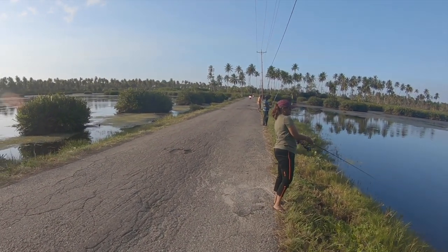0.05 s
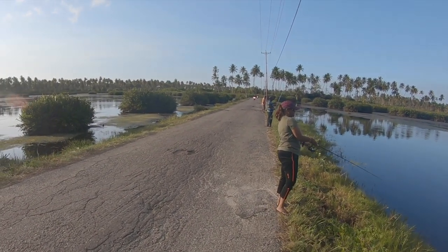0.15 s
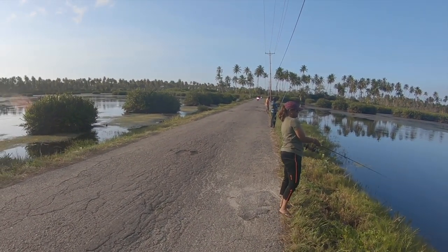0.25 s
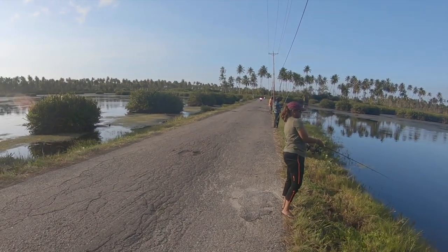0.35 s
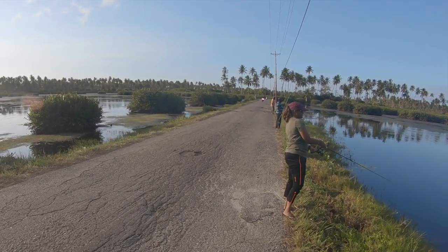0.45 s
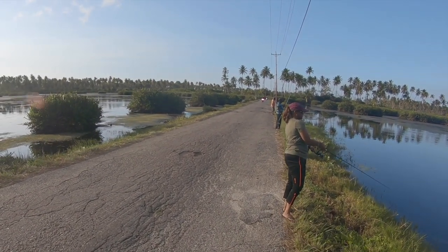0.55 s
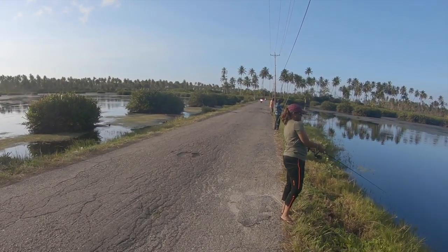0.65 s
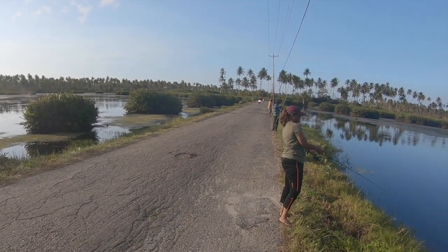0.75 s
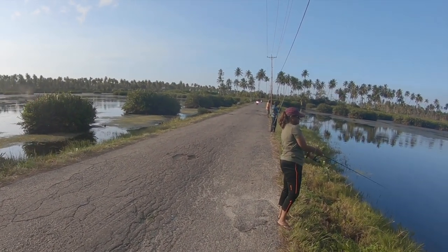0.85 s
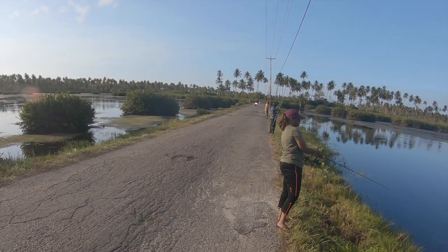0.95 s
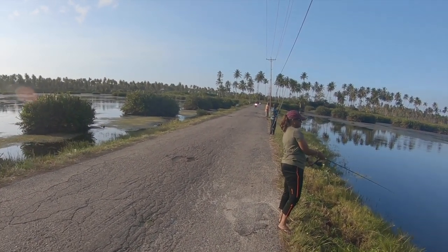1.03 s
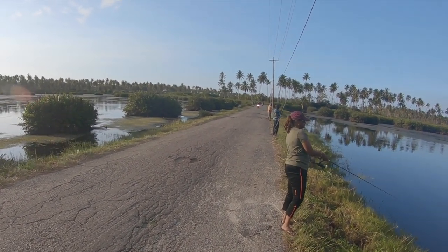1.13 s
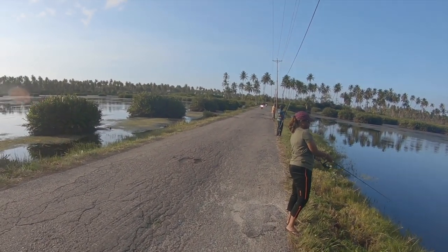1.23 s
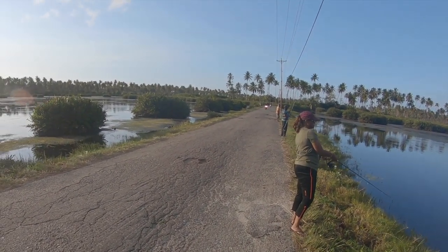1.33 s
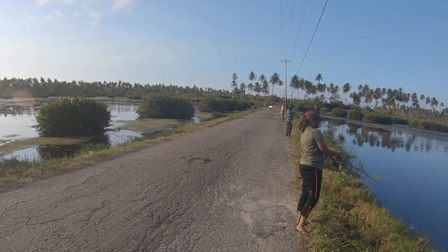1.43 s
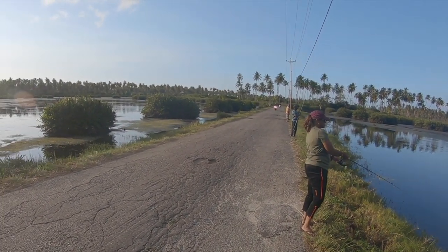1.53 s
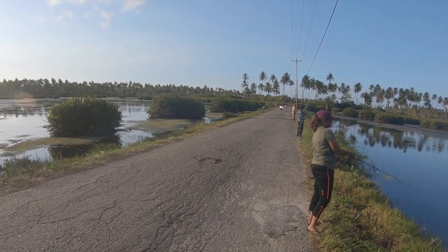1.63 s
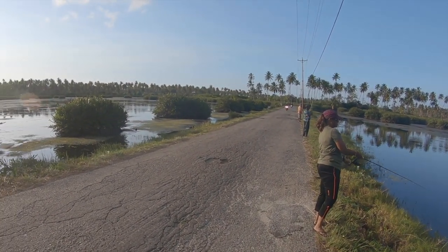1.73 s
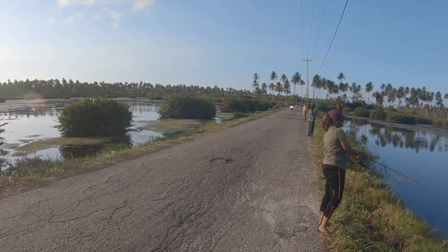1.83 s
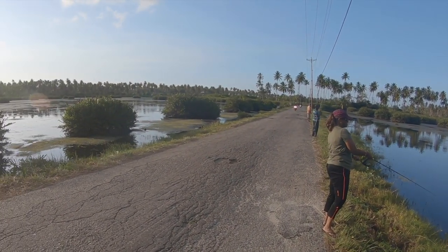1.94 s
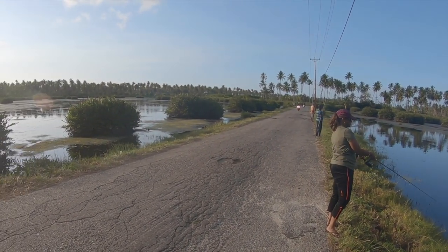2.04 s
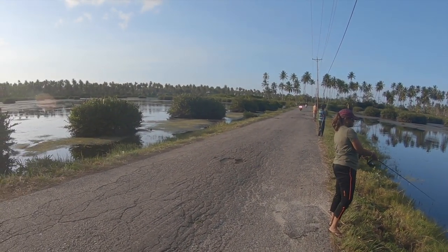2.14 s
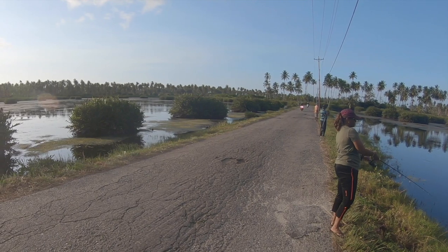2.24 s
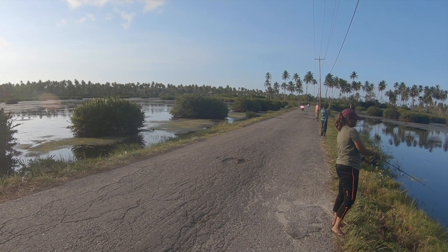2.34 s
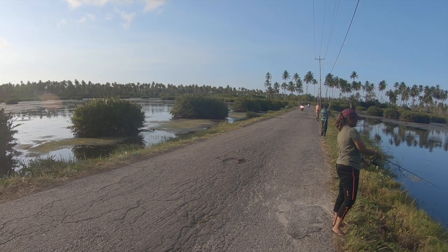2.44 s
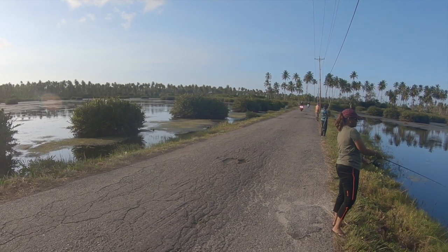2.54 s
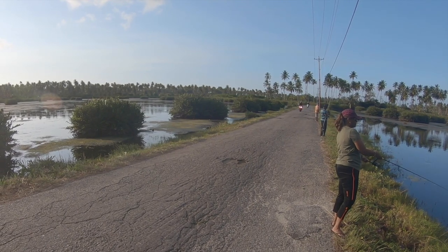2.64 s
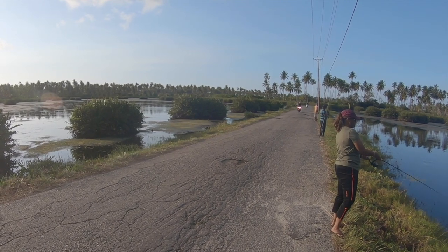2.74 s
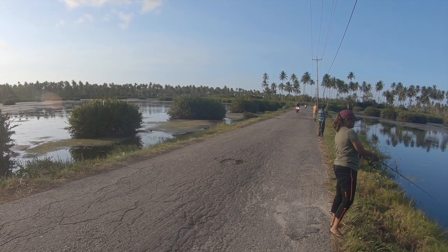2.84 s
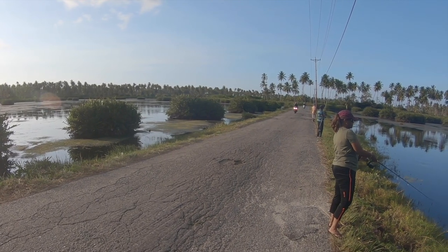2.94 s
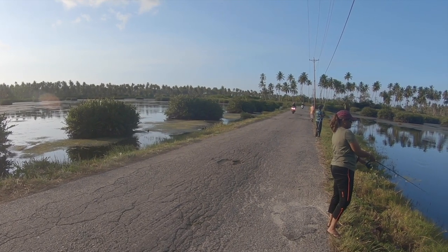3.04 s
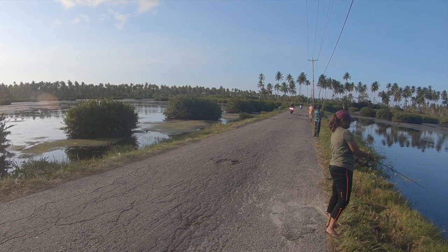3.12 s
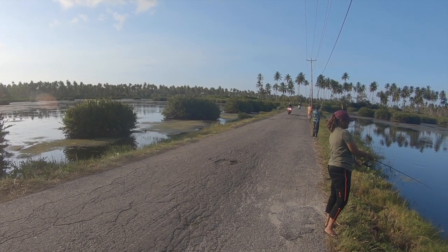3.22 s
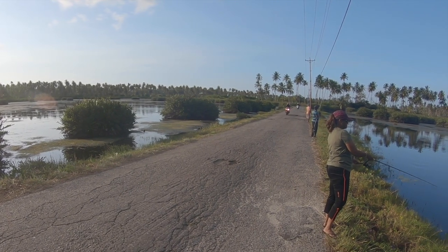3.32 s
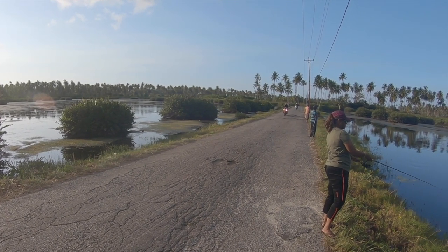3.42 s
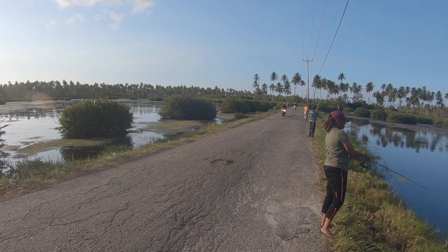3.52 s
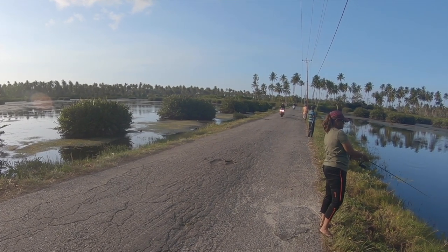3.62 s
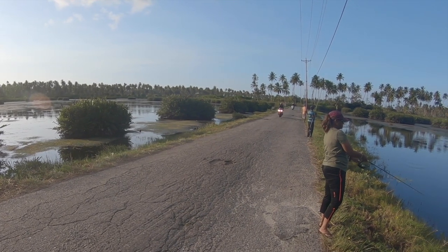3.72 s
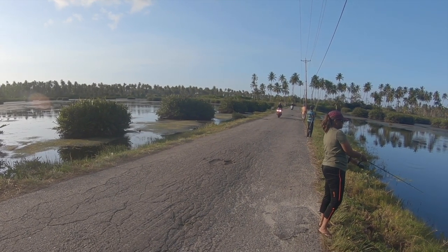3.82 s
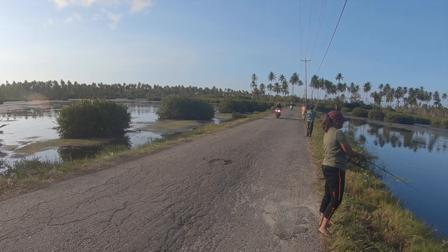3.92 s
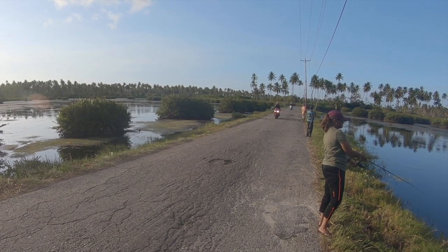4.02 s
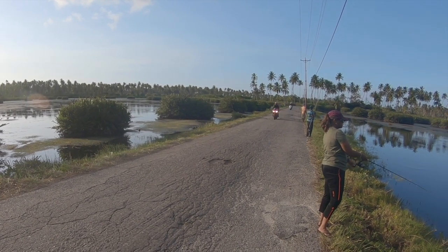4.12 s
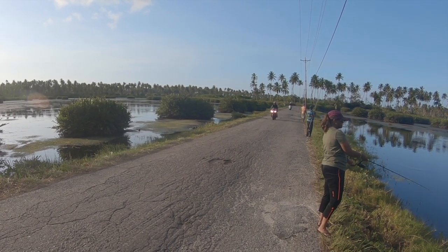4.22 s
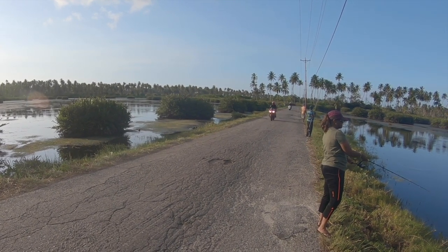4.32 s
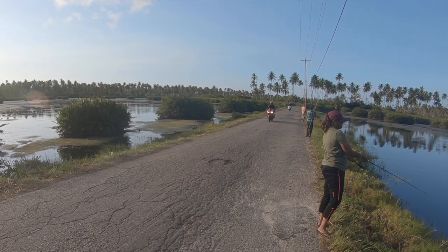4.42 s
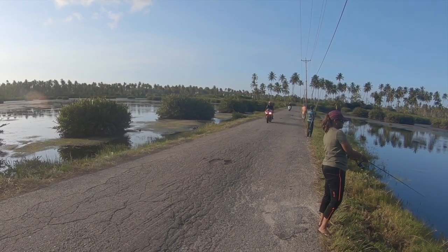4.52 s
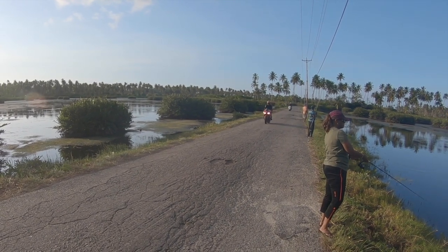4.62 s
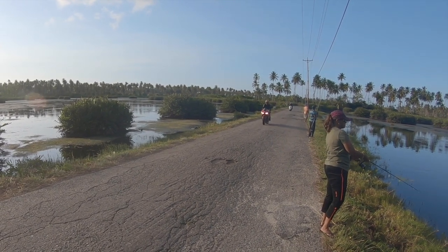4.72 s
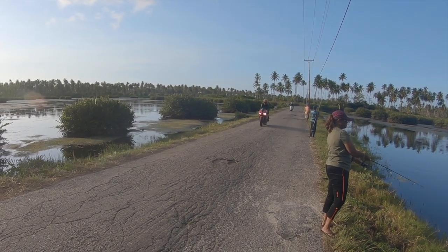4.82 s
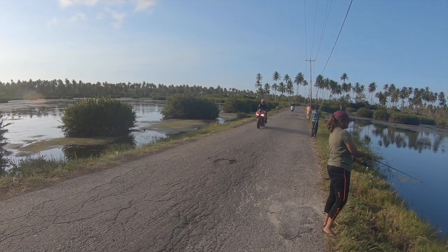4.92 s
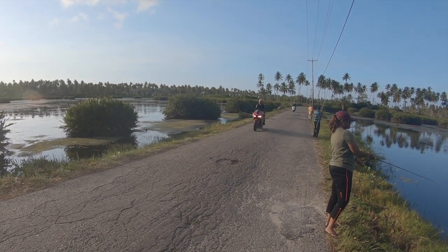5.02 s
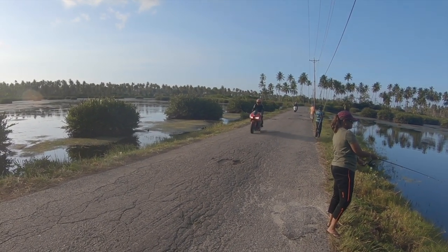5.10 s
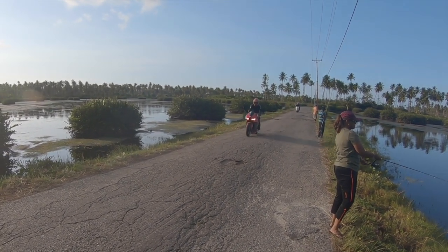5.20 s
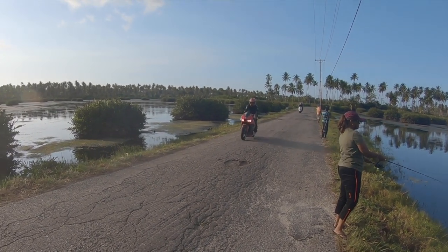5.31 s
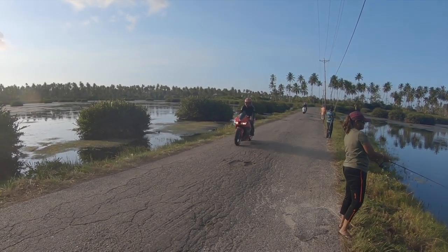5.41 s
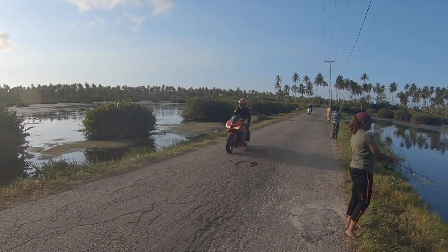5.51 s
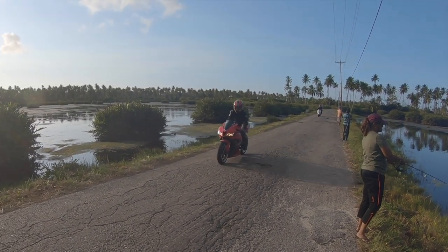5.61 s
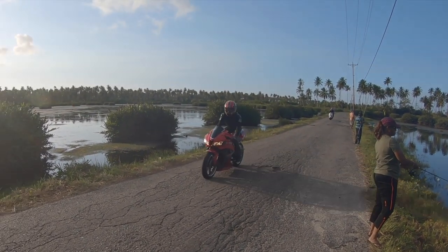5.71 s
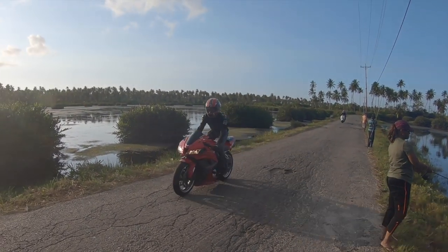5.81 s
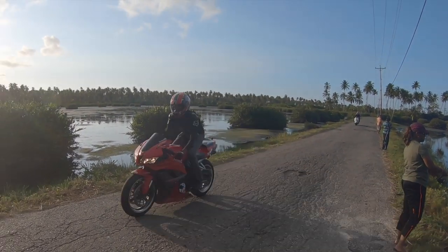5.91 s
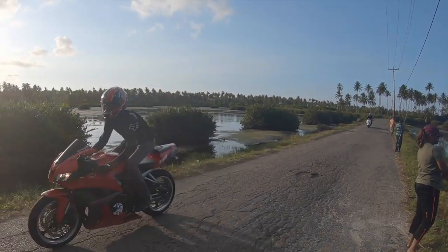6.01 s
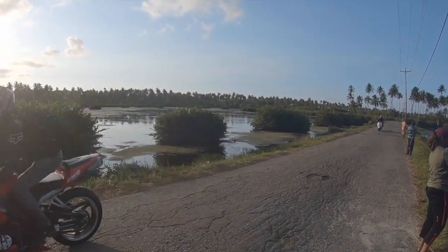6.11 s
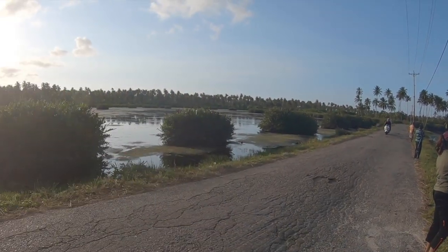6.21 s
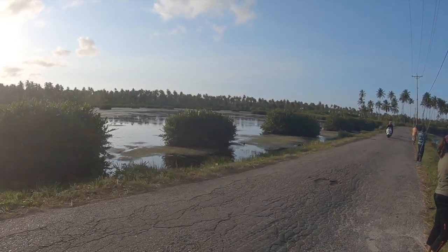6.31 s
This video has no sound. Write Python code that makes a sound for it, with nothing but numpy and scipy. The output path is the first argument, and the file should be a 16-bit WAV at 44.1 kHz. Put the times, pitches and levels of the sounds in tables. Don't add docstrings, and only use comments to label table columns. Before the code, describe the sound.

Outdoors on a quiet pond road, a small camera microphone hears several distant motorcycles as a low blended drone, with faint bird chirps and tiny dry ticks. One engine's deep hum takes over, wavering slightly as it swells. Tyre hiss builds, then the bike bursts past very close with a rasping growl and a rush of air, its pitch dipping only a little, still loud at the end.

```python
import sys
import numpy as np
from scipy import signal
from scipy.fft import rfft, irfft, next_fast_len
from scipy.io import wavfile
from scipy.ndimage import uniform_filter1d

SR = 44100
rng = np.random.default_rng(int(sys.argv[2]) if len(sys.argv) > 2 else 0)


def gain_from_db(level_db):
    decades = np.asarray(level_db, float) / 20
    return 10 ** decades


def int16_out(signal):
    q = np.round(np.clip(np.atleast_2d(signal).T, -1, 1) * 32767)
    wavfile.write(sys.argv[1], SR, q.astype(np.int16))


N = 280211
SIZE = next_fast_len(N, real=True)
FREQ = np.maximum(np.fft.rfftfreq(SIZE, 1 / SR), 1)
TIME = np.arange(N) / SR


def over_hz(table):
    hz, value = np.transpose(table)
    return np.interp(np.log(FREQ), np.log(np.maximum(hz, 1)), value)


def over_time(table):
    s, *columns = np.transpose(table)
    return [np.interp(TIME, s, c) for c in columns]


def walk(rate_hz):
    hold = int(SR / rate_hz)
    steps = np.repeat(rng.standard_normal(N // hold + 1), hold)
    return 1.3 * uniform_filter1d(uniform_filter1d(steps, hold), hold)[:N]


def engine(hz, orders, shimmer_db, fade_db, wander, blur):
    crank = 2 * np.pi * np.cumsum(hz * (1 + wander * walk(12.))) / SR
    start = rng.uniform(0, 2 * np.pi, len(orders))
    hum = 0
    for (k, gain), phase in zip(orders, start):
        air = gain_from_db(shimmer_db * walk(14.) + fade_db * walk(4.038))
        hum = hum + gain * air * np.sin(k * crank + phase + blur * k * walk(20.))
    return np.sqrt(2) * hum, crank


def noise(shape, swell_db, flicker_db, rate_hz):
    colour = rfft(rng.standard_normal((2, SIZE))) * gain_from_db(over_hz(shape))
    octave, out, swell = np.log2(FREQ), 0, swell_db * walk(rate_hz)
    for centre in np.arange(np.log2(shape[0][0]), np.log2(shape[-1][0]) + .5, .5):
        slot = np.clip(1 - 2 * abs(octave - centre), 0, 1)
        out = out + irfft(colour * slot, SIZE)[:, :N] * gain_from_db(swell + flicker_db * walk(rate_hz))
    return out / out.std()


SPEED_M_S, PASSES_S, KERB_M = 10.22, 6.002, 2.59


def distance(lag_s):
    return np.hypot(SPEED_M_S * (TIME - PASSES_S - lag_s), KERB_M)


ROAD_SHARE = 0.81


def detour():
    pipe_lag_s, heights_m = 0.3, 2.114
    r = distance(pipe_lag_s)
    return np.hypot(r, heights_m) - r


RUSH = {"roar": (-28.5, 1.56, -21.5, 4), "tyres": (-59.5, 1.67, -38.5, 2.5),
        "rear tyre": (-97, .1, -40, 4.5), "chain": (-67.5, 2.5, -42.5, 1.37), "fizz": (-95, 2, -58.5, 2.5),
        "wake": (-94.5, 0, -39.5, 5.5), "rasp": (-93.5, 1, -41.5, 5.5)}
LAG_S = {"roar": .25, "tyres": -.13, "rear tyre": .22, "chain": -.02, "fizz": .05, "wake": .1, "rasp": -.02}


def rush(name):
    pack_db, rise_db, near_db, steep = RUSH[name]
    bike = gain_from_db(near_db) * (KERB_M / distance(LAG_S[name])) ** steep
    return np.hypot(gain_from_db(pack_db + rise_db * TIME), bike)


# (time [s], firing rate [Hz], level [dB], throttle [0-1])
LEAD = [(0, 120.7, -22, 0.86), (.6, 118.3, -25, 0.73), (.68, 118, -20.5, 0.2), (1.6, 113.1, -27, .1),
        (2.2, 110.5, -18, .1), (3.05, 107.4, -16.5, 0.1), (3.22, 104.3, -17, 0.7), (3.7, 103.6, -9.5, 0.78),
        (3.95, 102.5, -10.5, .75), (4.35, 102.3, -4.5, 0.8), (4.65, 102, -2.5, 0.8),
        (5.0, 102.5, -2.1, 0.74), (5.4, 102.6, -0.5, 0.81), (5.65, 102.6, -1, 0.85), (5.95, 102.6, 3, .6),
        (6.0, 99.05, 2, 0.5), (6.2, 97.77, -1, 0.9), (6.35, 98.4, 0, 0.8)]
# (order [x], level [dB], share of level change [-], lift by throttle [dB], lift behind the pipe [dB])
LEAD_ORDERS = [(.5, -41, 0.21, -1.5, 6.5), (1, -18.5, 0.51, -0.7, 4), (1.5, -37.5, 0.59, -5.5, 5.5),
               (2, -15.5, 1, 1, 0.8), (2.5, -58, 0.17, 20.5, 10), (3, -48.5, .05, 20.5, -2),
               (3.5, -51.5, 0.2, 21, -3), (4, -32.5, 0.29, 3.5, 6), (4.5, -49, 0.56, 0.5, 7.5),
               (5, -28, 0.86, 0.8, 5.5), (5.5, -50.5, .95, -0.5, 6.5), (6, -63.5, 0.062, 17, 14)]
# (order [x], level against the rasp [dB])
GROWL = [(5.5, -5), (6, 5), (6.5, -0.5), (7, 2.5), (7.5, -6.5), (8, -5), (8.5, -8.5), (9, -5.5),
         (9.5, -8.5), (10, -6.5)]
# (order [x], level against the rear tyre [dB])
TAIL_PIPE = [(8.5, -4.5), (9, 0), (9.5, -4), (10, -2)]
# (peak time [s], gain [Hz], rise [s], fall [s])
FLARES = [(3.621, 3.13, 0.3556, 0.044), (3.86, 3.9, .15, 0.031), (4.201, 2.04, 0.045, .2),
          (4.675, 3.16, .07, .06), (4.799, 2.37, .05, .05), (4.941, 2.23, .07, 0.045),
          (5.249, 2.4, .25, .17), (5.53, 1.59, .08, .08), (5.87, 1.82, .25, .04), (6.272, 1.1, .08, .08)]
# (time [s], width [s], depth [dB])
DIP = (5.985, .011, -13)


def first_bike():
    hz, level_db, throttle = over_time(LEAD)
    for s, gain_hz, rise_s, fall_s in FLARES:
        hz = hz + np.interp(TIME, [s - rise_s, s, s + fall_s], [0, gain_hz, 0])
    r = distance(0)
    pipe_turns_s, turn_s, rear_road_share = 5.97, 0.048, 0.45
    rear = .5 + .5 * np.tanh((TIME - pipe_turns_s) / turn_s)
    share = np.clip(ROAD_SHARE + (rear_road_share - ROAD_SHARE) * rear, 0, .95)
    delay_s = detour() / 343

    def road(k):
        return abs(1 + share * np.exp(2j * np.pi * k * hz * delay_s)) / (1 + share)

    orders = []
    for k, db, part, lift_db, rear_db in LEAD_ORDERS:
        orders.append((k, road(k) * gain_from_db(db + part * level_db + lift_db * throttle + rear_db * rear)))
    close, tail = rush("rasp"), rush("rear tyre")
    orders += [(k, road(k) * close * gain_from_db(db)) for k, db in GROWL]
    orders += [(k, tail * gain_from_db(db)) for k, db in TAIL_PIPE]
    hum, crank = engine(hz, orders, shimmer_db=.55, fade_db=.4 + .03 * r, wander=.002, blur=.04 + .002 * r)
    dip_s, width_s, depth_db = DIP
    dip = gain_from_db(depth_db * np.exp(-.5 * ((TIME - dip_s) / width_s) ** 2))
    return hum * dip, crank, level_db


# (frequency [Hz], level per Hz [dB])
ROAR_COLOUR = [(12, -55), (20, -17.5), (38, -19.5), (75, 0.5), (108, 1.5), (150, -4.5), (185, -10.5),
               (270, -16.5), (393, -11), (427, -14), (546, -18), (664, -29.5), (1000, -37), (1300, -76.5),
               (2200, -120)]


def roar(puff, lead_db):
    covered = gain_from_db(-0.4 * np.clip(lead_db + 11, 0, 14))
    return rush("roar") * covered * puff * noise(ROAR_COLOUR, swell_db=1.5, flicker_db=-0.63, rate_hz=8.1)


# (frequency [Hz], level per Hz [dB])
RASP_COLOUR = [(420, -30.5), (580, 4.5), (720, 0.7), (950, -7), (1300, -24.5)]


def rasp(puff):
    gas = noise(RASP_COLOUR, swell_db=0.8, flicker_db=1.5, rate_hz=30.)
    delay_s = detour() / 343
    mirrored = np.array([np.interp(TIME - delay_s, TIME, c) for c in gas])
    return rush("rasp") * puff * (gas + ROAD_SHARE * mirrored)


# (time [s], lag [ms], share [-])
BOUNCE = [
    (0, 2.434, 0.21),
    (3, 2.377, 0.33),
    (5.3, 2.21, 0.82),
    (5.8, 2.1, 0.082),
    (6.35, 2.1, .1),
]


def bounce(x):
    lag_ms, share = over_time(BOUNCE)
    treble = irfft(rfft(x, SIZE) * np.clip((FREQ - 1250) / 400, 0, 1), SIZE)[:, :N]
    late = np.array([np.interp(TIME - lag_ms / 1000, TIME, c) for c in treble])
    return x - share * late


# (frequency [Hz], level per Hz [dB])
TYRES_COLOUR = [(500, -27.5), (750, -2.5), (1100, -1.5), (1500, -1.5), (1950, -5.5), (2300, -9.5),
                (2800, -20.5), (3600, -43.5)]
# (from [s], to [s], edge [s], lift [dB])
ROUGH_ROAD = (3.4, 4.854, 0.13, 2.3)


def tyres(puff):
    start, end, edge, rough_db = ROUGH_ROAD
    corners = [start - edge, start + edge, end - edge, end + edge]
    front = rush("tyres") * gain_from_db(np.interp(TIME, corners, [0, rough_db, rough_db, 0]))
    tread = noise(TYRES_COLOUR, swell_db=1.08, flicker_db=0.6, rate_hz=15.)
    return np.hypot(front, rush("rear tyre")) * puff * bounce(tread)


# (frequency [Hz], level per Hz [dB])
CHAIN_COLOUR = [(1800, -20), (2400, -1.5), (3200, 1.2), (4000, -4), (4600, -6), (5050, -8.5), (5500, -2.5),
                (6100, -2), (7000, -7.5), (7700, -9), (8100, -18.5), (9000, -42)]


def chain():
    return rush("chain") * noise(CHAIN_COLOUR, swell_db=1, flicker_db=1.3, rate_hz=30)


# (frequency [Hz], level per Hz [dB])
WAKE_COLOUR = [(600, -25.5), (1000, -3), (2500, -1.5), (4600, 2.5), (6500, -3.5), (7600, -18), (8400, -29)]


def wake(puff):
    return rush("wake") * puff * noise(WAKE_COLOUR, swell_db=1, flicker_db=1.3, rate_hz=30)


# (frequency [Hz], level per Hz [dB])
FIZZ_COLOUR = [(7000, -31.5), (8200, -2.5), (9800, -4), (12000, -1), (13100, -2.5), (14400, -10.5),
               (15600, -14), (16300, -42.5)]


def fizz():
    return rush("fizz") * noise(FIZZ_COLOUR, swell_db=1, flicker_db=1, rate_hz=25)


def far_bike(track, table, muffler_hz, steep, **air):
    hz, level_db, throttle = over_time(track)
    orders = []
    for k, db, lift_db in table:
        muffler = np.hypot(1, (k * hz / muffler_hz) ** steep)
        orders.append((k, gain_from_db(level_db + db + lift_db * throttle) / muffler))
    return engine(hz, orders, **air)[0]


# (time [s], firing rate [Hz], level [dB], throttle [0-1])
SECOND = [(0, 78.56, -36, .7), (.75, 82.47, -30, 0.7), (1.6, 86.9, -30.5, 1), (2.0, 88.08, -31, 0.7),
          (2.5, 91, -27.5, 0.7), (3.0, 92.64, -27.5, 0.3), (3.4, 92.04, -26.5, 0.7),
          (3.75, 92.8, -25.5, 0.5), (4.3, 92.2, -29.5, .4), (4.75, 90.73, -26, 0.1),
          (5.25, 90.42, -35.5, .05), (5.75, 88.1, -33, .05), (6.1, 85.73, -22.5, 0.8),
          (6.35, 85.46, -24.5, 0.4)]
# (order [x], level [dB], lift by throttle [dB])
SECOND_ORDERS = [(1, -1.5, 4), (2, -17, 13.5), (3, -19, 3.7), (4, -11.5, 0.4), (5, -28, 17),
                 (6, -19.5, 13.5)]


def second_bike():
    return far_bike(SECOND, SECOND_ORDERS, muffler_hz=483, steep=15,
                    shimmer_db=1.0, fade_db=-0.8, wander=.003, blur=0.074)


# (time [s], firing rate [Hz], level [dB], throttle [0-1])
THIRD = [(0, 113.6, -37.5, 0.4), (.25, 114.8, -30, 0.12), (.75, 123.9, -31, 0.22),
         (1.1, 132.2, -30.5, 0.56), (1.6, 146.6, -33, 0.84), (2.1, 152.6, -33.5, .9),
         (2.8, 165.8, -35, .95), (3.4, 182.5, -35.5, 1), (3.8, 193.2, -39, 0.4)]
# (order [x], level [dB], lift by throttle [dB])
THIRD_ORDERS = [(.5, -4, .1), (1, 2, .1), (2, -15, 3), (3, -14, 11), (4, 1, -28.5), (5, -31.5, 27),
                (6, -10.5, -19)]


def third_bike():
    hum = far_bike(THIRD, THIRD_ORDERS, muffler_hz=600, steep=5,
                   shimmer_db=2.2, fade_db=1.1, wander=.005, blur=.26)
    return hum * np.clip((3.95 - TIME) / 0.24, 0, 1)


# (time [s], firing rate [Hz], level [dB], throttle [0-1])
FOURTH = [
    (0, 148.7, -30, 0),
    (.6, 149.2, -39, 0),
    (1.2, 147.8, -40, 0),
    (1.6, 149.8, -56.5, 0),
    (6.35, 148.4, -91, 0),
]
# (order [x], level [dB], lift by throttle [dB])
FOURTH_ORDERS = [(1, 4.5, 0), (2, -10.5, 0), (4, -15.5, 0)]


def fourth_bike():
    return far_bike(FOURTH, FOURTH_ORDERS, muffler_hz=2000, steep=3,
                    shimmer_db=-3.5, fade_db=0.0, wander=0.0063, blur=.15)


# (time [s], peak [dB], centre [Hz], left minus right [dB], relative width [-])
TICKS = [(0.3024, -47.5, 2680, -6.5, 0.49), (0.3242, -46, 2710, 2, 0.54), (0.3655, -46, 2690, -13, 0.35),
         (0.3774, -46, 2500, -4, 0.35), (0.3874, -44, 2600, -9, 0.39), (0.483, -44, 2970, -9, 0.32),
         (0.5207, -52, 2880, -10, 0.35), (4.2923, -37, 2844, -2.5, 0.34), (0.3995, -48, 3200, 2, 0.5),
         (0.4095, -45, 3100, -4, .4), (.4105, -49.5, 7000, -3, 0.13), (.415, -44, 2960, -11, 0.37),
         (1.1199, -47.5, 3500, -9, 1.2), (1.128, -45, 2600, -9, .9), (1.1364, -48.5, 4170, -16, 0.83),
         (5.7294, -33, 4190, 2, 0.82), (1.5145, -40.5, 3197, 9, 0.078), (.288, -51, 6150, 0.1, 0.22),
         (6.305, -27, 1475, 8, 0.98), (6.313, -35, 1200, 2, .8)]


def ticks(fade_s=0.0014):
    out, t = np.zeros((2, N)), TIME[:1024]
    top = signal.butter(6, 7900, fs=SR)
    for (s, db, hz, pan_db, width), burst in zip(TICKS, rng.standard_normal((len(TICKS), 1024))):
        spread = 1 + np.clip(width, .05, 3)
        band = signal.butter(2, [hz / spread, min(hz * spread, 7400)], "band", fs=SR)
        snap = signal.lfilter(*top, signal.lfilter(*band, burst * t * np.exp(-t / fade_s)))
        sides = gain_from_db(db + np.array([pan_db, -pan_db]) / 2)
        i = int(s * SR)
        out[:, i:i + 1024] += np.outer(sides, snap / abs(snap).max())
    return out


def note(s, length_s, hz, db, waver_db=3.0):
    out, i, n = np.zeros(N), int(s * SR), int(length_s * SR)
    bend = np.interp(np.linspace(0, 1, n), np.linspace(0, 1, len(hz)), hz)
    waver = gain_from_db(waver_db * np.interp(np.linspace(0, 11, n), np.arange(12), rng.standard_normal(12)))
    tone = np.sqrt(2) * np.sin(2 * np.pi * np.cumsum(bend) / SR)
    out[i:i + n] = gain_from_db(db) * waver * np.hanning(n) ** .5 * tone
    return out


# (time [s], length [s], pitch [Hz], arch [Hz], level [dB])
BIRDS = [(0.073, 0.07, 3900, -26, -71), (0.276, 0.073, 4060, 4, -66), (1.004, 0.066, 5600, -45, -70),
         (1.177, 0.088, 3150, -40, -65), (1.33, 0.053, 5190, 144, -69), (1.339, 0.048, 3915, 34, -68),
         (1.409, .07, 3035, -15, -68), (1.79, 0.068, 5150, 100, -69), (1.792, .077, 3850, 123, -68),
         (1.951, .06, 3125, 29, -68)]
# (time [s], level [dB])
TRILL = [(2.145, -65), (2.255, -64), (2.36, -63), (2.475, -66), (2.59, -66), (2.725, -68), (2.85, -69),
         (2.97, -69)]


def birds():
    notes = sum(note(s, length, (hz, hz + arch, hz), db) for s, length, hz, arch, db in BIRDS)
    fall_hz = (5050., 4700., 4650., 4550., 4200., 3800.)
    trill = sum(note(s - .005, .062, fall_hz, db, waver_db=4.5) for s, db in TRILL)
    return notes + trill + gain_from_db(-8) * np.roll(trill, int(.017 * SR))


# (frequency [Hz], left minus right [dB])
BALANCE_DB = [(60, -1), (170, -1.75), (300, -2.5), (500, -5.5), (850, -3.5), (1450, -1.8), (4210, -1.2),
              (9000, 2.7)]
# (frequency [Hz], left leads by [rad])
LEAD_RAD = [(60, 0.01), (600, 0.29), (1120, 0.52), (1720, 0.67), (2760, 0.37), (4130, .2), (5500, 0.95),
            (7300, 0.97)]
# (frequency [Hz], likeness of the two ports [0-1])
LIKENESS = [(30, .45), (60, .88), (120, 1), (470, 0.99), (920, .55), (1830, .8), (5000, .72), (9000, 0.3)]


def ports(direct, scattered):
    like = np.clip(over_hz(LIKENESS), 0, 1)
    tilt = gain_from_db(over_hz(BALANCE_DB) / 2) * np.exp(.5j * over_hz(LEAD_RAD))
    mid = rfft(direct, SIZE)
    side = rfft(scattered, SIZE) * np.sqrt((1 - like) / (1 + like))
    return irfft(np.array([(mid + side) * tilt, (mid - side) / tilt]), SIZE)[:, :N]


def scene():
    lead, crank, lead_db = first_bike()
    engines = lead + second_bike() + third_bike() + fourth_bike()
    puff = gain_from_db(2.2 * np.cos(crank))
    broad = roar(puff, lead_db) + rasp(puff) + tyres(puff) + chain() + wake(puff) + fizz()
    song = birds()
    opening = np.clip(TIME / .002, 0, 1)
    direct = engines + song + broad[0]
    scattered = broad[1] + 1.2 * song
    return ports(opening * direct, opening * scattered) + ticks()


def roll_off(x):
    return signal.sosfilt(signal.butter(12, 15700, fs=SR, output="sos"), x)


def record(dry):
    ceiling = 0.66
    held = dry / (1 + abs(dry / ceiling) ** 4) ** .25
    return roll_off(held)


dry = scene()
out = record(dry)
int16_out(out)
```